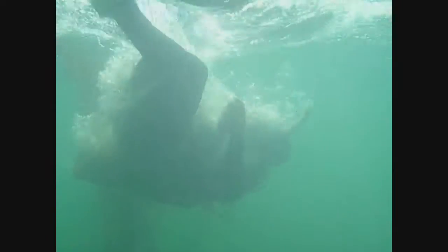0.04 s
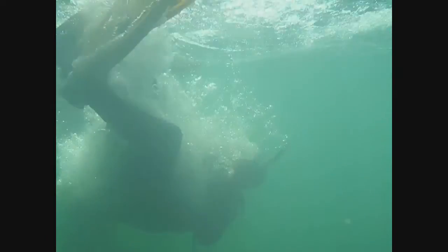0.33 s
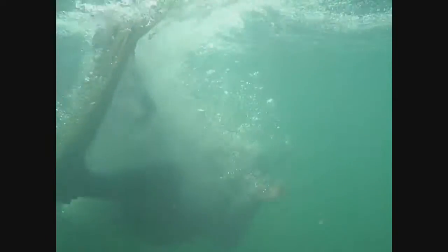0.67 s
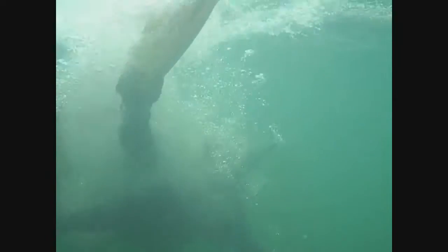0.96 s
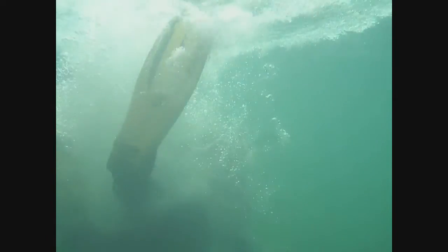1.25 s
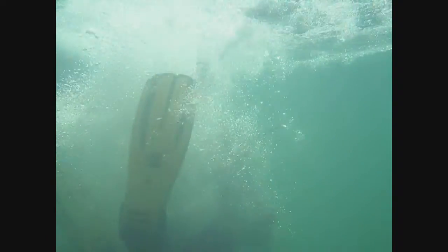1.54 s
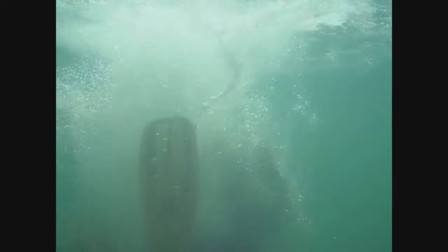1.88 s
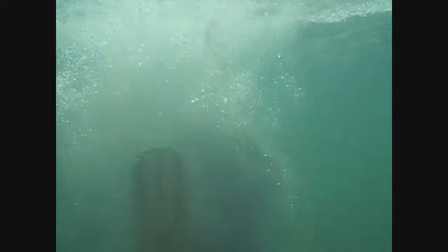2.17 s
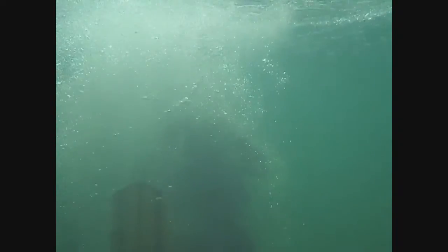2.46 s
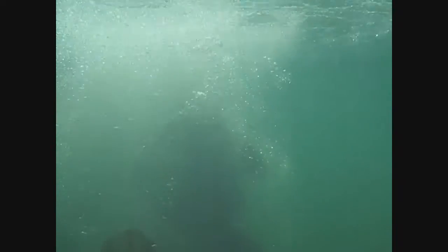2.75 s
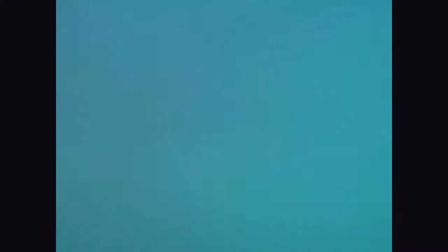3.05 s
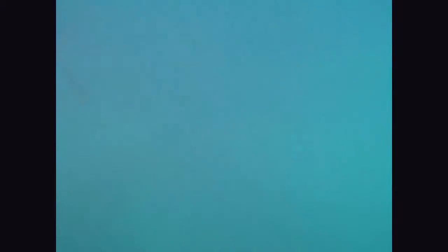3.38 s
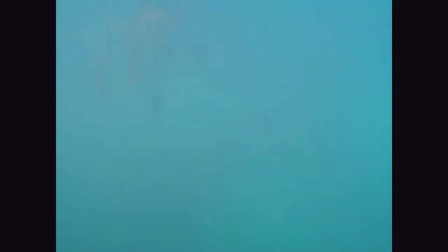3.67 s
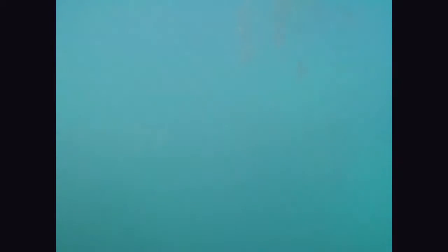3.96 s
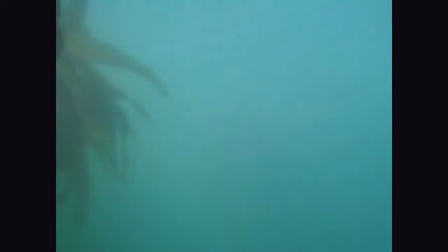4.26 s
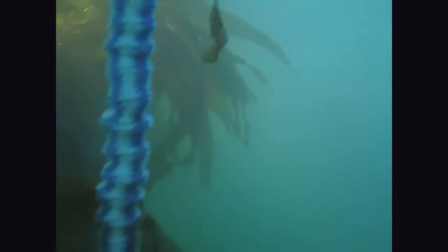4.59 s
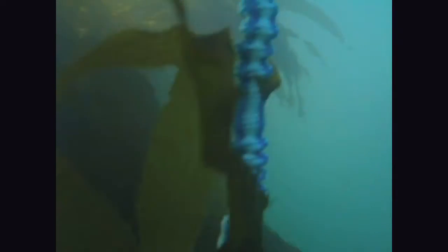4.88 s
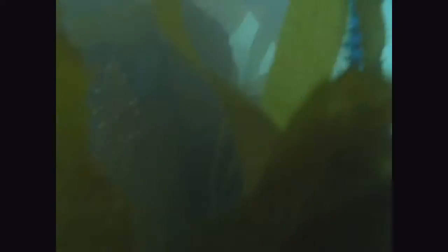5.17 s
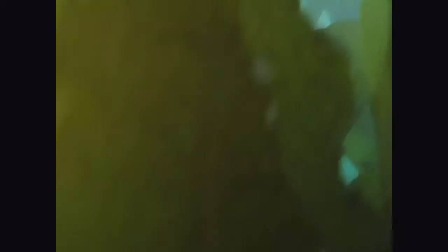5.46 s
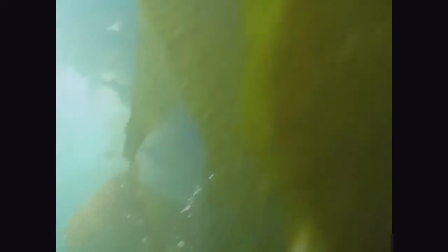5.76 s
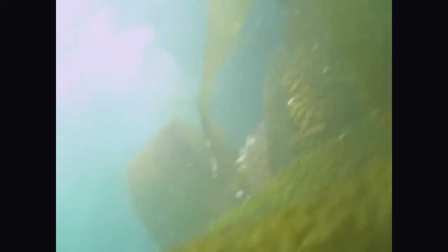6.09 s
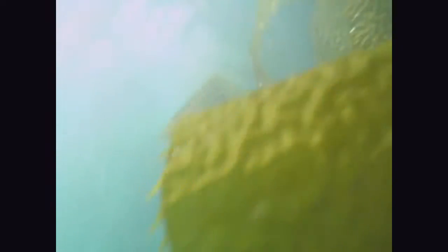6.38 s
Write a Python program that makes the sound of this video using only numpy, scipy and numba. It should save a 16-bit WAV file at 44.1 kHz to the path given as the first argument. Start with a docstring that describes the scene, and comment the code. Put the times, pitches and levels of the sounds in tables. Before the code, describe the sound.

Just under the sea surface, a cloud of bubbles from a diver's plunge rushes, gurgles and fizzes, thinning out over about two seconds. Muffled churning and sloshing carry on over a low rumble, with hollow gulps of air booming close by, mostly on the right. Late on, a rope and kelp make a few faint, dull knocks. It is all heard from inside a waterproof camera housing.

```python
"""Big gulps of air booming against a waterproof camera housing, close up and mostly on the right.
The stereo microphones sit inside the housing, just under the sea surface, where a diver has just plunged in.
In front, the cloud of entrained air rushes and fizzes away, leaving faint foam all round. Water keeps
churning and sloshing, sounding the housing's low resonances. Later a rope and kelp scrape past."""
import sys
import numpy as np
from scipy import signal
from scipy.fft import rfft, irfft, next_fast_len
from scipy.io import wavfile
from scipy.ndimage import uniform_filter1d, minimum_filter1d
from numba import njit

SR = 44100
rng = np.random.default_rng(int(sys.argv[2]) if len(sys.argv) > 2 else 0)


def unload_audio(sound):
    """Save the sound as a 16-bit wav file, at the path given as the first command line argument."""
    columns = np.transpose(np.atleast_2d(sound))
    # keep every value between -1 and 1, then stretch to whole-number steps
    steps = np.round(np.clip(columns, -1, 1) * 32767)
    wavfile.write(sys.argv[1], SR, steps.astype(np.int16))


N = 292383
T = np.arange(N) / SR

# Levels are relative: each source adds its own gain and pan.
# the loudest air pockets pulsing against the housing: (time [s], level [dB], pitch [Hz], t60 [s])
AIR_POCKETS = [(0.355, -8.5, 365, 0.032), (0.441, -24, 300, 0.091), (0.682, -19, 329, 0.19),
               (0.737, -14.5, 174, 0.057), (0.919, -10.5, 332, 0.21), (1.264, -11.5, 307, 0.087),
               (1.513, -16, 264.5, 0.31), (1.572, -22, 517, 0.097), (1.579, -12.5, 315, 0.075),
               (1.727, -19.5, 470, 0.12), (2.021, -17, 204, 0.3), (2.131, -15.5, 415, 0.15),
               (2.254, -16, 323, 0.095), (2.292, -14.5, 422, 0.11), (2.37, -11.5, 287.5, 0.19),
               (2.608, -5, 285, 0.073), (2.722, -7, 279, 0.21), (2.83, -14, 286, 0.093),
               (2.987, -10, 281, 0.08), (3.05, -10.5, 270.3, 0.25), (3.24, -12.5, 308, 0.16),
               (3.389, -3.5, 326, 0.043), (3.492, -17.5, 433, 0.083), (3.616, -9, 316, 0.049),
               (3.657, -14, 313, 0.11), (3.799, -14.5, 337.3, 0.13), (4.128, -7.5, 276, 0.032),
               (4.187, -11.5, 244, 0.061), (4.246, -5, 282, 0.032), (4.537, -9, 256, 0.06),
               (4.584, -17.5, 460, 0.046), (4.65, -14, 278, 0.042), (4.987, -16.5, 273, 0.043),
               (5.105, -6.5, 340, 0.049), (5.179, -7.5, 289, 0.08), (5.215, -13.5, 301.5, 0.5),
               (5.482, -14, 308, 0.1), (5.578, -2, 325, 0.077), (5.637, -14.5, 369, 0.17),
               (5.74, -14, 309.6, 0.14), (5.796, -5, 287, 0.15), (5.929, -7, 292, 0.069),
               (6.072, -9, 311, 0.02), (6.108, -7.5, 197.5, 0.046), (6.146, -1.5, 201, 0.078),
               (6.165, -4.5, 364, 0.035), (6.257, -7.5, 308, 0.11), (6.272, -7, 213, 0.14),
               (6.353, -17, 292, 0.067), (6.426, -12, 242, 0.02)]
# steady churning between sloshes: (time [s], big bubble level [dB], small bubble level [dB])
CHURN_LEVELS = [(0.0, -21.5, -39), (0.7, -24.5, -29), (0.78, -25, -34), (1.25, -26.5, -39),
                (1.94, -28, -38), (2.64, -24.5, -39.5), (2.88, -30, -41), (3.3, -25.5, -39),
                (4.17, -27.5, -41), (4.36, -31.5, -44), (4.75, -28.5, -45), (4.89, -27, -41.5),
                (5.42, -32.5, -45.5), (5.56, -29, -44.5), (5.72, -28, -50), (6.1, -24.5, -43.5),
                (6.26, -24, -50), (6.39, -31, -42), (6.63, -24, -41)]
# water slapping the housing about twice a second: (time [s], length [s], boom level [dB], bass level [dB])
SLOSH_EVENTS = [(0.0, 0.21, -35, -29), (0.333, 0.17, -30, -23), (0.66, 0.053, -24, -28.5),
                (1.404, 0.2, -23, -36), (2.062, 0.079, -22, -31), (2.353, 0.18, -24.5, -38.5),
                (3.331, 0.076, -22, -33), (3.587, 0.12, -21.5, -28.5), (4.093, 0.22, -22.5, -31.5),
                (5.039, 0.078, -21.5, -30), (5.596, 0.32, -24.5, -32.5), (6.145, 0.15, -24, -22.5)]
# ringing streams of air: (time [s], length [s], level [dB], first pitch [Hz], last pitch [Hz])
AIR_STREAMS = [(2.512, 0.33, -21, 256.5, 283.6), (3.799, .32, -28.5, 353, 411)]
# fizz of the plunge cloud: (time [s], level [dB])
CLOUD_LEVELS = [(0, -44.5), (.15, -47), (.52, -44), (.9, -47.5), (1.2, -53.5), (1.6, -57.5), (2.2, -70.5),
                (2.6, -108)]
# lone bubbles pinching off close by: (time [s], level [dB], pitch [Hz])
LONE_BUBBLES = [(1.889, -37, 726), (2.301, -23, 530), (2.323, -29, 714), (2.35, -28, 600),
                (2.485, -27.5, 670), (3.398, -34, 717), (4.929, -35.5, 780), (5.172, -34, 606),
                (5.215, -31.5, 664), (5.44, -39.5, 850), (5.587, -28, 645), (5.753, -31.5, 642)]
# water pushing on the housing: (time [s], level [dB])
SURGE_LEVELS = [(0, -50), (.6, -34.5), (3.5, -33), (4.17, -30), (4.7, -39.5), (5.2, -35), (6.18, -29),
                (6.63, -35.5)]
# rope and kelp catching on the housing: (time [s], level [dB], tick pitch [Hz])
ROPE_CATCHES = [(4.809, -44, 1000), (4.837, -38, 1380), (4.878, -37.5, 1880), (4.905, -45, 1710),
                (4.951, -37, 1390), (6.346, -45.5, 1360)]
# lingering foam: (time [s], left level [dB], right minus left [dB])
FOAM_LEVELS = [(0, -46.5, -4), (1.2, -49, -3.5), (2.3, -55, 0.5), (4, -58.5, 0.5), (4.7, -65.5, -1.5),
               (5.3, -66.5, -25.5), (6.63, -65.5, -12)]
# tone of each bubble swarm and of the surge at the microphones: (frequency [Hz], gain [dB])
BIG_BUBBLE_EQ = [(50, -34), (95, -2.5), (190, 0.5), (420, -1.5), (500, -8.5), (620, -20)]
SMALL_BUBBLE_EQ = [(300, -16), (500, 1), (760, -5), (880, -12.5), (1020, -16.5), (1300, -26), (1900, -39.5)]
FIZZ_EQ = [(350, -10.5), (650, 20.5), (1000, 15), (1350, 5), (2500, -1), (3400, -6.5), (4400, -4.5),
           (6200, -9.5), (7000, -18.5), (11500, -18.5), (13400, -21), (14200, -26.5)]
FOAM_EQ = [(500, -9), (1000, 0), (1500, -3.5), (3400, -12.5), (4300, -19), (5400, -42.5)]
SURGE_EQ = [(8, -15.5), (25, 8), (45, -3), (75, 0.5), (110, -0.5), (200, -27.5)]
# resonances of the housing's air space and of its thin shell: (frequency [Hz], width [Hz], gain [dB])
AIR_SPACE_MODES = [(178, 18, -8.5), (281, 43, 1.5), (347, 60, -0.5)]
SHELL_MODES = [(7900, 480, 1), (9700, 420, 4), (11250, 1300, 1.5)]

PLUNGE_SHARE = np.interp(T, [.8, 1.6], [1, 0])  # how much of the churning still comes from the plunge


def gulps():
    """Right at the housing, each air pocket swells in a cycle or two and rings, trembling as it deforms."""
    swell_cycles, rise, tremble, left_lead_rad = 1.35, .05, .15, .99
    out, age = np.zeros((2, N), complex), T[:SR // 4]
    for s, db, hz, t60 in AIR_POCKETS:
        swell = 1 - np.exp(-(age * hz / swell_cycles) ** 2)
        envelope = swell * np.exp(-np.log(1000) * age / t60) * (1 - age / age[-1])
        envelope = envelope / envelope.max() * np.exp(tremble * wobble(44, len(age)))
        # a gulp that finds the housing still ringing falls in step with it
        start_phase = np.angle(out[1, int(s * SR)] + .03 * np.exp(2j * np.pi * rng.random()))
        phase = start_phase + 2 * np.pi * hz * (age + rise * age ** 2 / t60 / 2)
        tone = np.exp(1j * (phase + np.array([[left_lead_rad], [0]])))
        # the nearer to the main resonance of the housing, the more it booms on the right
        side_db = -4 - 12 / (1 + ((hz - AIR_SPACE_MODES[1][0]) / 45) ** 2)
        add(out, s, undb(db) * pan(side_db) * envelope * tone)
    return lowpass(out.imag, 850)


def churn(pockets):
    """All round, big bubbles gurgle and small ones patter; the housing's air space booms on the right."""
    shared = .18 + .55 * PLUNGE_SHARE  # one cloud at first, then bubbles on every side
    big = stereo(lambda: swarm(per_s=800, low_hz=61.8, high_hz=760.4, cycles=12, spread_db=2), shared)
    small = stereo(lambda: swarm(per_s=1100, low_hz=344, high_hz=2487, cycles=13, spread_db=3), shared)
    big, small = equalise(big, BIG_BUBBLE_EQ), equalise(small, SMALL_BUBBLE_EQ)
    flow, slosh = curve(CHURN_LEVELS), slosh_gain(column=2)
    gurgle = big * flow * undb(5.06 * PLUNGE_SHARE) * undb([[0], [-3.5]])
    deep = signal.sosfilt(signal.butter(2, [80, 200], "bandpass", fs=SR, output="sos"), gurgle)
    gurgle = gurgle - deep * .5 * (1 - PLUNGE_SHARE)  # the largest bubbles soon rise away
    # every air pocket and slosh sheds small bubbles on top of the steady patter
    shed = undb(-40) * uniform_filter1d(np.abs(pockets), size=256) + slosh * undb(-33) * pan(-6.5)
    steady = curve(CHURN_LEVELS, column=2) * undb(1 - 5.6 * PLUNGE_SHARE) * pan(.5)
    patter = small * (shed + steady)
    drive = np.hypot(flow * undb(-30 * PLUNGE_SHARE), slosh)
    boom = unit(resonate(big[1], AIR_SPACE_MODES)) * drive * undb([[-18], [0]])
    return gurgle + patter + boom


def sloshes():
    """Each slosh breaks off lesser gulps just right of centre and deep bubbles, well left in the plunge."""
    lesser = swarm(per_s=110, low_hz=227, high_hz=417, cycles=4.5, spread_db=-1.6, rise=.05)
    lesser = lesser * slosh_gain(column=2) * undb(-8.5) * pan(-1)
    deep = stereo(lambda: swarm(per_s=280, low_hz=65.4, high_hz=186.5, cycles=6.4, spread_db=-.5), .75)
    lean_left = undb(np.array([[1], [-1]]) * (1 + 6.5 * PLUNGE_SHARE) / 2)
    return lowpass(lesser + deep * slosh_gain(column=3) * lean_left, 700)


def slosh_gain(column):
    """Gain over time from one level column of the sloshes: each swells, holds and dies away."""
    attack_s, release_s = .0082, .007
    gain = np.zeros(N)
    for row in SLOSH_EVENTS:
        age, length = T - row[0], row[1]
        attack = np.clip(age / attack_s + .5, 0, 1)
        release = np.exp(-np.maximum(age - length, 0) / release_s)
        gain = np.maximum(gain, undb(row[column]) * attack * release)
    return gain


def streams():
    """On the right, a stream of air rings as one wavering tone that climbs quickly and levels off."""
    waver, tremble_db = .022, .5
    out = np.zeros((2, N))
    for s, length, db, first_hz, last_hz in AIR_STREAMS:
        along = np.linspace(0, 1, int(length * SR))
        glide_hz = last_hz - (last_hz - first_hz) * (1 - along) ** 2
        hz = glide_hz * (1 + waver * wobble(22, len(along)))
        envelope = np.tanh(np.pi * np.sin(np.pi * along)) * undb(db + tremble_db * wobble(31, len(along)))
        tone = np.sqrt(2) * np.sin(2 * np.pi * np.cumsum(hz) / SR)
        add(out, s, pan(-12) * envelope * tone)
    return out


def plunge_cloud():
    """Countless tiny bubbles in front of the camera; their fizz rings the shell."""
    cloud = stereo(lambda: swarm(per_s=14000, low_hz=317, high_hz=15100, cycles=3.6, spread_db=-1, rise=.1),
                   shared=1)
    fizz = equalise(cloud, FIZZ_EQ)
    return unit(fizz + resonate(fizz, SHELL_MODES)) * curve(CLOUD_LEVELS) * undb(12) * pan(1.4)


def plips():
    """Close by, a lone bubble pinches off sharply and rings briefly, rising in pitch."""
    s, db, hz = np.transpose(LONE_BUBBLES)
    cycles = 21 * rng.uniform(.8, 1.2, len(s))
    rings = ring_bubbles((s * SR).astype(np.int64), hz.copy(), cycles, undb(db + 5), rise=.19)
    return lowpass(rings, 1250, order=4) * pan(.5)


def housing_hum():
    """Among the kelp, moving water keeps a low resonance of the housing ringing, louder as it churns."""
    hz, width_hz, from_s, fade_s = 194.7, 30, 4.63, .32
    ringing = noise_band(stereo(lambda: rng.standard_normal(N), shared=.57), hz, width_hz)
    fade_in = np.clip((T - from_s) / fade_s, 0, 1)
    return ringing * fade_in * unit(curve(CHURN_LEVELS)) * undb(-30) * pan(-9.5)


def surge():
    """Eddies press on each side of the housing separately, a rumble under the bubbles."""
    eddies = equalise(stereo(lambda: rng.standard_normal(N), shared=.011), SURGE_EQ)
    return eddies * curve(SURGE_LEVELS) * undb(3) * pan(4.5)


def rope():
    """Rope or kelp catches on the housing and lets go: a gritty, dull knock with a little tick on top."""
    t60_s, knock_hz = .052, 806
    out, age = np.zeros((2, N)), T[:SR // 20]
    decay = np.exp(-np.log(1000) * age / t60_s)
    for s, db, tick_hz in ROPE_CATCHES:
        rub = rng.standard_normal(len(age))
        knock = undb(17.5) * noise_band(rub, knock_hz, width_hz=320)
        tick = noise_band(rub, tick_hz, width_hz=540)
        add(out, s, undb(db) * pan(2.2) * unit(knock + tick) * decay)
    return lowpass(out, 2100, order=8)


def foam():
    """Fine bubbles seethe faintly all round and linger after the cloud has risen."""
    seethe = stereo(lambda: swarm(per_s=6300, low_hz=480, high_hz=5140, cycles=10, spread_db=0), .075)
    balance = np.array([np.ones(N), curve(FOAM_LEVELS, column=2)])
    return equalise(seethe, FOAM_EQ) * curve(FOAM_LEVELS) * balance


def swarm(per_s, low_hz, high_hz, cycles, spread_db, rise=.2):
    """Bubbles born at random, with even power across their range; spread_db scatters their levels."""
    draws = np.random.default_rng(rng.integers(1 << 30)).random((int(per_s * N / SR), 5))
    birth, pitch, level, life, polarity = draws.T
    hz = low_hz + (high_hz - low_hz) * pitch
    scatter = np.minimum(-np.log1p(-level), 2 * np.e)  # exponential, capped
    amplitude = undb(spread_db * scatter) * np.sqrt(hz) * np.sign(polarity - .5)
    return unit(ring_bubbles((birth * N).astype(np.int64), hz, cycles * (.5 + life), amplitude, rise))


@njit
def ring_bubbles(start, hz, cycles, amplitude, rise):
    """Each bubble is a sine that swells within a cycle, dies by 60 dB and climbs in pitch."""
    out = np.zeros(N)
    for k in range(len(start)):
        count = int(cycles[k] * SR / hz[k]) + 2
        fade, swell = np.exp(-np.log(1000) / count), np.exp(-2 * hz[k] / SR)
        level, held_back, phase = amplitude[k], 1., 0.
        for i in range(min(count, N - start[k])):
            phase += 2 * np.pi * hz[k] / SR * (1 + rise * i / count)
            level, held_back = level * fade, held_back * swell
            out[start[k] + i] += level * (1 - held_back) * np.sin(phase)
    return out


def stereo(make, shared):
    """Two microphones hear one common sound (this share of the power) and each a close one of its own."""
    return np.sqrt(shared) * make() + np.sqrt(1 - shared) * np.array([make(), make()])


def pan(db):
    """Microphone gains for a left minus right level, mean power 1."""
    return unit(undb(np.array([[db], [-db]]) / 2))


def equalise(x, points):
    """Shape a sound by (Hz, dB) points, falling 30 dB an octave beyond them; rms 1."""
    hz, db = np.transpose(points)
    size = next_fast_len(N + 8192)
    f = np.maximum(np.fft.rfftfreq(size, 1 / SR), 1)
    octaves_outside = np.maximum(np.log2(hz[0] / f), 0) + np.maximum(np.log2(f / hz[-1]), 0)
    gain = undb(np.interp(np.log(f), np.log(hz), db) - 30 * octaves_outside)
    return unit(irfft(rfft(x, size) * gain, size)[..., :N])


def resonate(x, modes):
    """Sum of (frequency [Hz], width [Hz], gain [dB]) resonances."""
    return sum(undb(db) * signal.lfilter(*signal.iirpeak(hz, hz / width, fs=SR), x)
               for hz, width, db in modes)


def noise_band(noise, hz, width_hz):
    """Noise passed twice through one resonance; rms 1."""
    mode = [(hz, width_hz, 0)]
    return unit(resonate(resonate(noise, mode), mode))


def lowpass(x, hz, order=2):
    """Roll off the treble."""
    return signal.sosfilt(signal.butter(order, hz, fs=SR, output="sos"), x)


def wobble(hz, count):
    """Slow random motion; rms 1."""
    return unit(lowpass(rng.standard_normal(count), hz))


def curve(table, column=1):
    """Gain over time from one dB column of a table."""
    rows = np.array(table)
    return undb(np.interp(T, rows[:, 0], rows[:, column]))


def add(out, s, sound):
    """Mix a short sound in at s seconds."""
    i = int(s * SR)
    out[:, i:i + sound.shape[-1]] += sound[:, :N - i]


def undb(db):
    """Decibels to gain."""
    return 10 ** (np.asarray(db) / 20)


def unit(x):
    """Scale to rms 1."""
    return x / np.sqrt(np.mean(x ** 2))


def scene():
    """All the water round the camera, over a trace of microphone hiss."""
    pockets = gulps()
    bubbles = pockets + plunge_cloud() + foam() + churn(pockets) + sloshes() + plips() + streams()
    return bubbles + housing_hum() + surge() + rope() + undb(-100.5) * rng.standard_normal(N)


def record(dry):
    """The gain eases down on the loudest peaks, and the camera cuts the top."""
    ceiling, top_hz = .95, 15600
    needed_gain = ceiling / np.maximum(np.abs(dry).max(axis=0), ceiling)
    held_gain = minimum_filter1d(needed_gain, size=601)
    gain = uniform_filter1d(uniform_filter1d(held_gain, size=301), size=301)
    return signal.sosfilt(signal.ellip(8, .2, 70, top_hz, fs=SR, output="sos"), dry * gain)


dry = scene()
out = record(dry)
unload_audio(out)
```